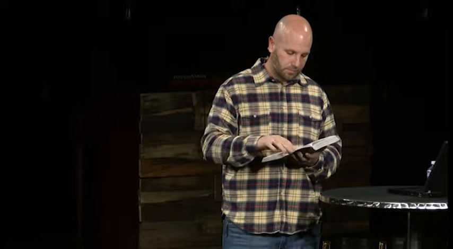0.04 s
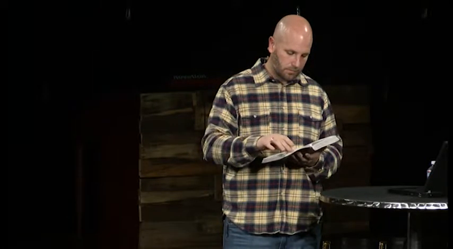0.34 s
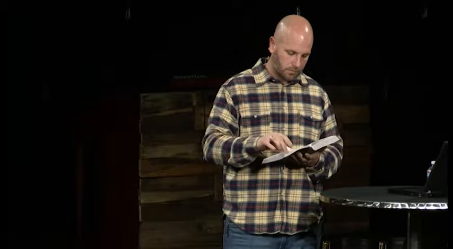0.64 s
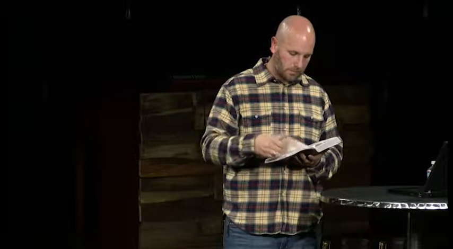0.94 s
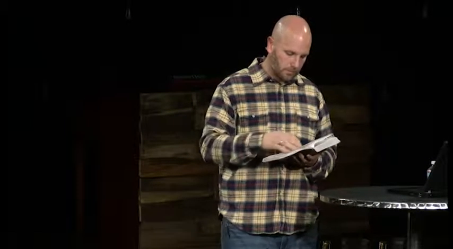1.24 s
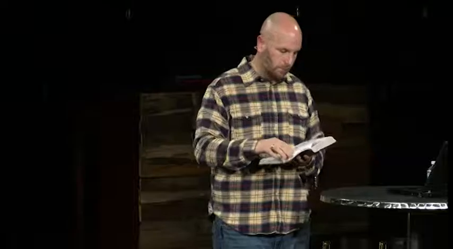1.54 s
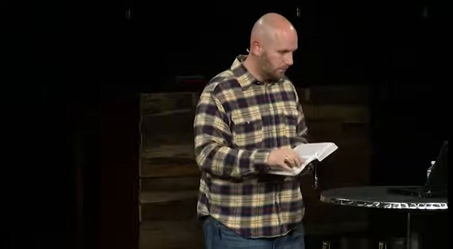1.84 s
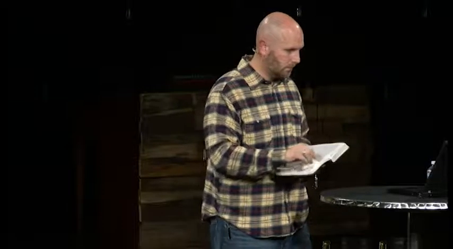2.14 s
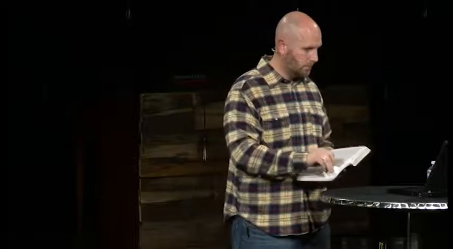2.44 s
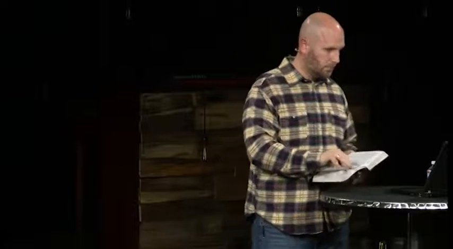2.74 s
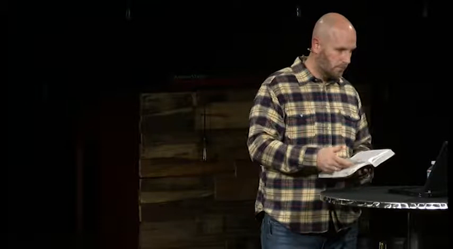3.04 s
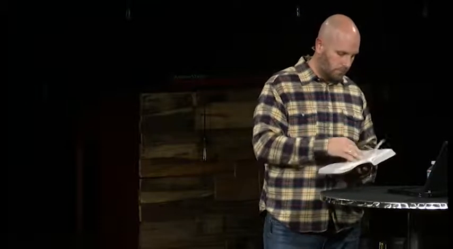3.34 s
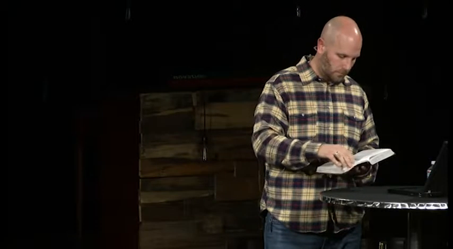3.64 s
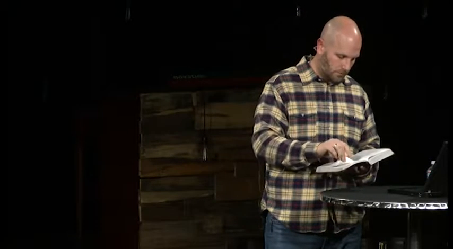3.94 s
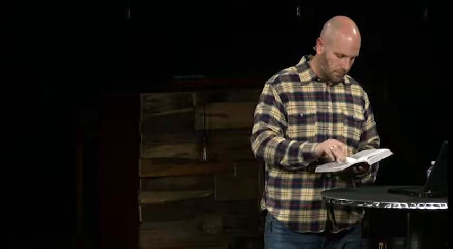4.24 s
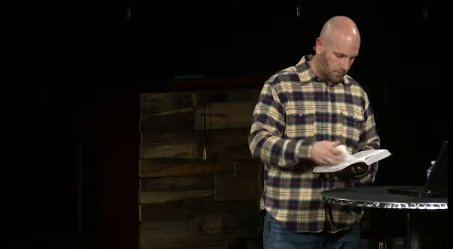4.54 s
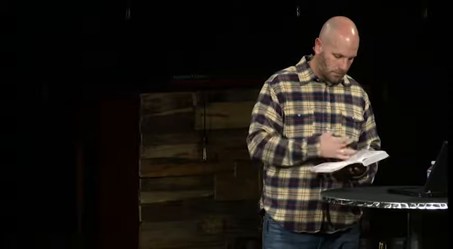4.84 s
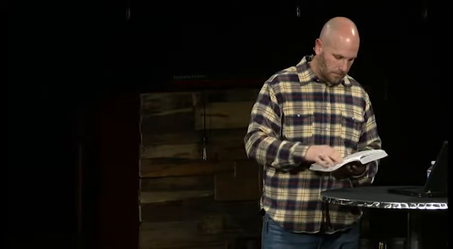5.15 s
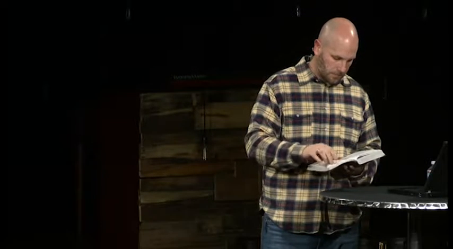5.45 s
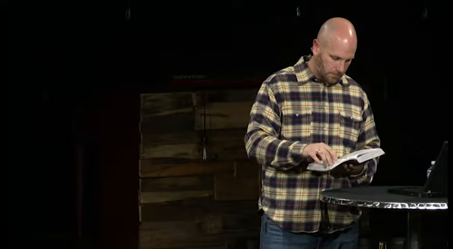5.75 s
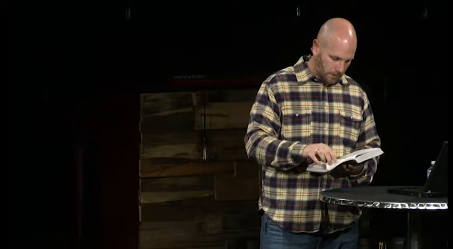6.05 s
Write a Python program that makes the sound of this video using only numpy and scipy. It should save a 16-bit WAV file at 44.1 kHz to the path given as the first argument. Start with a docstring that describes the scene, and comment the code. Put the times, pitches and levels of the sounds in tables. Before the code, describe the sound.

A low ventilation rumble and microphone hiss fill a large, quiet hall. Near the microphone, a thin book page turns with a quick, crisp crackle, followed by a faint, more distant scuff. Fingers slide over the paper in short strokes with light ticks and padded bumps, and two more pages flip and flatten. It ends with a soft, faintly whistling hiss, all with only a little echo.

```python
"""First comes the low rumble of a large hall's ventilation, under a small microphone's hiss.
Close by on the stage, someone leafs through a thin-paged book. Fingers rub and lift the sheets, whose
fibres catch and slip. Three pages buckle, flip over and whisper as they flatten; creases tick and
handling makes soft bumps. There is one scuff further off, and at the end a soft, faintly whistling
hiss swells. The hall answers softly with its echo."""
import sys
import numpy as np
from scipy import signal
from scipy.fft import rfft, irfft
from scipy.io import wavfile
from scipy.ndimage import uniform_filter1d

SR = 44100
rng = np.random.default_rng(int(sys.argv[2]) if len(sys.argv) > 2 else 0)


def store_wav(level_fs):
    """Save 16-bit WAV to argv[1]."""
    pcm = np.round(np.clip(np.atleast_2d(level_fs), -1, 1) * 32767)
    wavfile.write(sys.argv[1], SR, pcm.T.astype(np.int16))


N = 269010
TIME = np.arange(N) / SR

# Tone colours: how strong the low and high parts of each sound are.
# Each row: frequency in Hz, relative strength in dB.
VENTILATION_COLOUR = [(12, -33.5), (20, -14.5), (134, 0.5), (165, -1.5), (211, -6), (266, -6), (323, -12.5),
                      (381, -12.5), (487, -17), (643, -11.5), (1000, -32), (1300, -50), (2200, -120)]
MICROPHONE_HISS_COLOUR = [(600, -28), (900, -8.5), (1200, -1.5), (1500, -1), (1950, -8), (2400, -8),
                          (3050, -11.5), (4200, -3.5), (5200, -5.5), (6100, -8), (8000, -9.5),
                          (10100, -8.5), (11600, -1), (13900, 1.5)]
SCUFF_COLOUR = [(700, -34.5), (1300, -4), (1800, -8.5), (2300, -2), (2750, -8), (3300, -7), (5300, -6),
                (6100, -15), (6900, -13), (7800, -23.5), (15000, -40)]
SOFT_HISS_COLOUR = [(500, -15), (900, -19.5), (1250, -9), (2000, -14.5), (3200, -16), (4100, -8),
                    (4850, 1.5), (5400, -4.5), (6000, -6), (6700, -20), (7900, -24.5), (9000, -19),
                    (11500, -17), (15000, -23)]
PAPER_COLOUR = [(200, -19.5), (420, -22), (600, -14.5), (850, -24), (1200, -9.5), (1850, -15),
                (2400, -10.5), (3100, -6), (4000, 2.5), (5100, 3), (6400, -12), (9000, -9.5),
                (10000, -13.5), (11900, -3.5), (14800, -10)]

# How loud the far scuff, the soft hiss at the end and the resting hand are as time passes.
# Each row: time in seconds, level in dB.
SCUFF_LEVELS = [(1.908, -78.5), (1.922, -42.5), (1.936, -49.5), (1.955, -62), (1.975, -47.5), (2.0, -63.5),
                (2.06, -84.5)]
SOFT_HISS_LEVELS = [(5.52, -58), (5.6, -55), (5.83, -52.5), (6.03, -47.5), (6.1, -51.5)]
RESTING_LEVELS = [(0, -67), (2.3, -65.5), (2.45, -63.5), (3.0, -57), (3.6, -61), (4.4, -61.5), (5.0, -69),
                  (5.35, -60.5), (5.6, -74)]

# Soft bumps of handling and shifting weight.
# Each row: middle in seconds, pitch in Hz, peak level in dB, fade time to either side in seconds.
BUMPS = [(1.077, 55, -44, 0.006), (1.078, 157.4, -41, 0.00456), (2.229, 158.4, -44, 0.0045),
         (2.559, 74, -47.5, 0.016), (2.809, 59, -47, 0.0144), (3.743, 586, -49, 0.00188)]
# Fingers pushing a sheet over its neighbours. Each row: start in seconds, length in seconds,
# level in dB before the shared gain, treble in dB relative to that level, the sheet's peak in Hz.
RUBS = [(0.642, 0.0232, -60, 3.5, 4470), (0.836, 0.089, -55.5, -3, 4550), (2.374, 0.0805, -51, -6.5, 4840),
        (2.51, 0.161, -49, -7.5, 4200), (2.696, 0.069, -47.5, -0.5, 4350), (2.803, 0.122, -54, -8.5, 4860),
        (2.944, 0.0196, -43, -7, 3940), (3.09, 0.021, -44, -5, 4500), (3.355, 0.0675, -53.5, 3.5, 4420),
        (3.672, 0.039, -57.5, 5, 4680), (3.729, 0.0404, -57.5, -4, 4290), (3.802, 0.0148, -49, -8, 4400),
        (3.906, 0.1025, -59, -2, 4580), (4.034, 0.0944, -52.5, -6, 4430), (4.168, 0.0292, -45, -7.5, 4210),
        (4.271, 0.0334, -47.5, -4, 4490), (4.416, 0.049, -59.5, -14, 4190),
        (4.493, 0.0262, -47.5, -7.5, 4560), (5.045, 0.0269, -63.5, 7, 4600), (5.124, 0.03, -63.5, 5, 4560),
        (5.257, 0.0165, -56, -4.5, 4307), (5.423, 0.0823, -55, 0.5, 4560)]
# Single creases and page edges snapping.
# Each row: start in seconds, level in dB, then treble and body in dB relative to that level.
CREASE_TICKS = [(0.2118, -44.5, -1.5, -24), (0.9299, -40.5, -10, -16.5), (0.947, -37, -6, -25.5),
                (1.0739, -18, 0.5, -15.5), (1.3969, -47, -14.5, -11.5), (2.5369, -35, -11.5, -27),
                (2.798, -38, -3.5, -38), (2.9125, -27.5, -9, -23.5), (3.141, -33.5, -9.5, -37),
                (3.2148, -34, -3.5, -34), (3.408, -41.5, 0, -20), (3.8512, -40.5, -4.5, -6),
                (3.8544, -30, -10.5, -32.5), (3.9587, -46.5, -8, -32), (4.2048, -35.5, -0.5, -14),
                (4.272, -40, -12.5, -20.5), (4.5789, -45.5, -7, -15.5), (5.403, -48, -0.5, -29),
                (5.4125, -47.5, 1.5, -21.5), (5.5358, -41.5, 2, -28)]
# A sheet buckling or flapping. Each row: middle in seconds, length of the loud part in seconds,
# level in dB before the shared gain, then treble and body in dB relative to that level.
BUCKLES = [(0.963, 0.005, -39.5, -10.5, -24), (0.998, 0.00387, -33, -1.5, -15.5),
           (1.027, 0.0106, -33.5, -4.5, -18), (1.0546, 0.003, -35.5, -3.5, -13),
           (1.0749, 0.0034, -19.5, -0.95, -13.5), (1.097, 0.00372, -26, -9.5, -20.5),
           (1.115, 0.014, -38.5, 3.5, -23.5), (3.183, 0.0052, -35, -8.5, -28),
           (3.242, 0.0022, -26.5, 8, -14), (3.2578, 0.0072, -25.5, 3.5, -19.5),
           (3.267, 0.005, -27.5, 1.5, -22.5), (4.177, 0.00128, -28, 2.5, -10),
           (4.216, 0.001657, -30, -2.5, -10), (4.636, 0.0034, -36.5, 1.5, -9),
           (4.738, 0.00468, -30, -7.5, -12.5), (4.7443, 0.0041, -23.5, -3, -15),
           (4.769, 0.00266, -29, -5, -21), (4.78, 0.009, -31.5, -4.5, -26), (4.838, 0.01, -39, -13, -31),
           (4.864, 0.0027, -35.5, -28.5, -25.5), (5.543, 0.00485, -44, 2, -23.5),
           (5.707, 0.00404, -44, 6, -8.5)]
# A page lifted, flipped over and laid down.
# Each row: lift, flip and landing times in seconds, level at the flip in dB.
PAGE_TURNS = [(0.959, 1.08, 1.179, -38.5), (3.116, 3.231, 3.407, -41), (4.583, 4.77, 4.912, -42)]

# The paper sounds in three bands: body (the lows), middle and treble.
BODY_EDGE_HZ, TREBLE_EDGE_HZ, TOP_HZ = 2500, 7000, 16000
PAPER_PEAK_HZ, CREASE_PEAK_HZ = 4590, 4316  # a snapping crease rings a little lower than a sliding sheet


def amp(db):
    """Turn decibels into a number to multiply by."""
    return 10 ** (np.asarray(db) / 20)


def unit(x):
    """Scale a signal so that its average strength (rms) is 1."""
    return x / np.sqrt(np.mean(x ** 2))


def response(colour, lo_hz=1, hi_hz=SR, size=2048):
    """How something with this tone colour rings after one click, fading outside lo_hz to hi_hz."""
    freqs = np.maximum(np.arange(size // 2 + 1) * SR / size, 1)
    hz, db = np.transpose(colour)
    gain = amp(np.interp(np.log(freqs), np.log(hz), db))
    gain /= np.sqrt((1 + (lo_hz / freqs) ** 10) * (1 + (freqs / hi_hz) ** 20))
    # Keep the colour, but put all the ringing just after the click (minimum phase).
    cepstrum = irfft(np.log(gain + 1e-4))
    cepstrum[1:size // 2] *= 2
    cepstrum[size // 2 + 1:] = 0
    ringing = irfft(np.exp(rfft(cepstrum)))
    return ringing / np.sqrt(np.sum(ringing ** 2))


def ring(x, ringing):
    """Let every sample of a sound set off the given ringing."""
    return signal.oaconvolve(x, ringing)[:len(x)]


def add(track, start, sound):
    """Mix a short sound into a track; start is in seconds."""
    i = int(start * SR)
    track[i:i + len(sound)] += sound[:N - i]


def wander(rate):
    """A smooth random wobble that heads for a new value `rate` times a second."""
    hold = int(SR / rate)
    steps = np.repeat(rng.standard_normal(N // hold + 1), hold)
    return unit(uniform_filter1d(uniform_filter1d(steps, hold), hold)[:N])


def friction(rate, spread_db, cluster_db):
    """About `rate` tiny clicks a second, uneven and in clusters, like fibres catching and letting go."""
    slips = (rng.random(N) < rate / SR) * rng.standard_normal(N)
    sizes = amp(spread_db * np.minimum(rng.exponential(size=N), 4))
    return unit(slips * sizes * amp(cluster_db * wander(260)))


def contact(start, end, grip_s=0.0142, release_s=0.01515):
    """Paper takes hold quickly, drags evenly and lets go a little more slowly."""
    return np.exp(-np.maximum(start - TIME, 0) / grip_s - np.maximum(TIME - end, 0) / release_s)


def paper_bands(peak_hz):
    """How paper rings in its middle, treble and body; a longer free stretch has a lower middle peak."""
    shifted = [(hz * peak_hz / PAPER_PEAK_HZ, db) for hz, db in PAPER_COLOUR]
    middle = response(shifted, BODY_EDGE_HZ, TREBLE_EDGE_HZ)
    treble = response(PAPER_COLOUR, TREBLE_EDGE_HZ, TOP_HZ)
    body = response(PAPER_COLOUR, 188, BODY_EDGE_HZ)
    return middle, treble, body


def drag_paper(slips, bands, treble_db, body_db):
    """A stream of slips makes the paper's three bands ring."""
    return sum(ring(slips * amp(db), band) for band, db in zip(bands, (0, treble_db, body_db)))


def snap_paper(push, length, bands, db, treble_db, body_db):
    """One short push rings the three bands; each level is an average over `length` seconds."""
    push = np.pad(push, (0, 512))  # room to ring out
    out = 0
    for band, band_db in zip(bands, (0, treble_db, body_db)):
        sound = ring(push, band)
        out += amp(db + band_db) * sound * np.sqrt(length * SR / np.sum(sound ** 2))
    return out


def ventilation(level_db=-64, wobble_db=0.157):
    """The hall's ventilation rumbles, a little unevenly."""
    rumble = ring(rng.standard_normal(N), response(VENTILATION_COLOUR, hi_hz=1090, size=8192))
    return rumble * amp(level_db + wobble_db * wander(3.517))


def microphone_hiss(level_db=-59.5):
    """The microphone adds a steady hiss of its own."""
    tone = response(MICROPHONE_HISS_COLOUR, lo_hz=524, hi_hz=13970)
    return amp(level_db) * ring(rng.standard_normal(N), tone)


def hall_echo(x, fade_s=1.22, treble_fade_s=1.0, treble_db=-5, first_wall_s=0.0108, build_s=0.0079):
    """A wash of echoes builds up after the first wall; the air soaks up the treble sooner."""
    t = np.arange(2 * SR) / SR
    split_hz = 6200
    low = signal.sosfilt(signal.butter(4, split_hz, fs=SR, output="sos"), rng.standard_normal(len(t)))
    high_pass = signal.butter(4, split_hz, "high", fs=SR, output="sos")
    high = signal.sosfilt(high_pass, rng.standard_normal(len(t)))
    tail = low * amp(-60 * t / fade_s) + high * amp(treble_db - 60 * t / treble_fade_s)
    tail *= 1 - np.exp(-np.maximum(t - first_wall_s, 0) / build_s)
    return ring(x, tail / np.sqrt(np.sum(tail ** 2)))


def swish(levels, colour):
    """Tiny clicks, so dense that they sound like smooth noise, swell and fade in the given colour."""
    times, db = np.transpose(levels)
    sounding = (TIME >= times[0]) & (TIME <= times[-1] + 0.03)
    loudness = amp(np.interp(TIME, times, db)) * sounding
    grains = friction(rate=20000, spread_db=4, cluster_db=0.84)
    return ring(grains * loudness, response(colour, lo_hz=396))


def handling_bumps():
    """Handling and shifting weight make padded knocks, only a few vibrations long."""
    out = np.zeros(N)
    for centre, hz, db, fade_s in BUMPS:
        t = np.arange(-2 * fade_s, 2 * fade_s, 1 / SR)
        swell = np.exp(-(t / fade_s) ** 2)
        add(out, centre - 2 * fade_s, amp(db) * swell * np.sin(2 * np.pi * hz * t))
    return out


def resting_hand(bands):
    """Fingers lying on the paper are never quite still, so they rustle faintly."""
    times, db = np.transpose(RESTING_LEVELS)
    force = amp(np.interp(TIME, times, db))
    slips = friction(rate=9000, spread_db=1.44, cluster_db=2.6)
    return drag_paper(force * slips, bands, treble_db=-6, body_db=-9)


def rubbing_sheets(bands, gain_db=0.0946, body_db=-16.5):
    """Fingers drag sheets over each other in short strokes; a sharp edge adds treble."""
    _, treble_band, body_band = bands
    slips = friction(rate=11000, spread_db=-0.72, cluster_db=1.5)
    middle, treble_force, body_force = np.zeros((3, N))
    for start, length, db, treble_db, peak_hz in RUBS:
        force = amp(gain_db + db) * contact(start, start + length)
        middle += ring(slips * force, paper_bands(peak_hz)[0])
        treble_force = np.maximum(treble_force, amp(treble_db) * force)
        body_force = np.maximum(body_force, amp(body_db) * force)
    return middle + ring(slips * treble_force, treble_band) + ring(slips * body_force, body_band)


def settling_pages(bands, level_db=-70, fade_s=0.358):
    """Each page that has landed flattens with a fading, finely crackling whisper."""
    force = np.zeros(N)
    for _, _, landing, _ in PAGE_TURNS:
        force += amp(level_db) * (TIME > landing) * np.exp(-np.abs(TIME - landing) / fade_s)
    slips = friction(rate=9000, spread_db=3.5, cluster_db=-0.3)
    return drag_paper(force * slips, bands, treble_db=10, body_db=-6)


def ticking_creases(bands, length_s=0.002774, fade_s=0.00061, crackle=0.42):
    """A crease snaps in one step and the paper around it crackles for a moment."""
    out = np.zeros(N)
    t = np.arange(400) / SR
    for start, *levels in CREASE_TICKS:
        push = crackle * rng.standard_normal(len(t)) * np.exp(-t / fade_s)
        push[0] = 1  # the snap itself
        add(out, start, snap_paper(push, length_s, bands, *levels))
    return out


def buckling_pages(bands, gain_db=-1.5, spread_db=2.0, width=0.673):
    """A rush of tiny creases swells and dies away as the sheet pops through."""
    out = np.zeros(N)
    for centre, length, *levels in BUCKLES:
        t = np.arange(-2 * length, 2 * length, 1 / SR)
        creases, sizes = rng.standard_normal((2, len(t)))
        swell = np.exp(-np.abs(t / (width * length)) ** 0.85)
        push = creases * amp(spread_db * sizes) * swell
        add(out, centre - 2 * length, snap_paper(push, length, bands, *levels))
    return amp(gain_db) * out


def turning_pages(bands, swell_db=10, fade_db=9, dull_db=9):
    """A page crinkles louder and brighter as it bends towards the flip, then calms until it lands."""
    force, slack = np.zeros((2, N))
    for lift, flip, landing, db in PAGE_TURNS:
        moments = (lift, flip, landing)
        held = contact(lift, landing)
        force += held * amp(db - np.interp(TIME, moments, (swell_db, 0, fade_db)))
        slack += held * np.interp(TIME, moments, (1, 0, 1))
    crinkles = force * friction(rate=4600, spread_db=3.0, cluster_db=2.0)
    return drag_paper(crinkles, bands, treble_db=-0.5 - dull_db * slack, body_db=-11.5)


def scene(near_echo_db=-21, scuff_echo_db=-6):
    """Near sounds have little echo, the far scuff much more; one microphone feeds both channels."""
    bands = paper_bands(PAPER_PEAK_HZ)
    book = turning_pages(bands) + settling_pages(bands) + buckling_pages(bands)
    book += ticking_creases(paper_bands(CREASE_PEAK_HZ))
    book += resting_hand(bands) + rubbing_sheets(bands) + handling_bumps()
    near = book + swish(SOFT_HISS_LEVELS, SOFT_HISS_COLOUR)
    scuff = swish(SCUFF_LEVELS, SCUFF_COLOUR)
    echo = hall_echo(amp(near_echo_db) * near + amp(scuff_echo_db) * scuff)
    mono = near + scuff + echo + ventilation() + microphone_hiss()
    return np.array([mono, mono])


def record(dry, soften_hz=16500):
    """The microphone softens the very highest treble, then a steep filter cuts above TOP_HZ."""
    softened = signal.sosfilt(signal.butter(2, soften_hz, fs=SR, output="sos"), dry)
    return signal.sosfilt(signal.ellip(8, 0.2, 70, TOP_HZ, fs=SR, output="sos"), softened)


dry = scene()
out = record(dry)
store_wav(out)
```